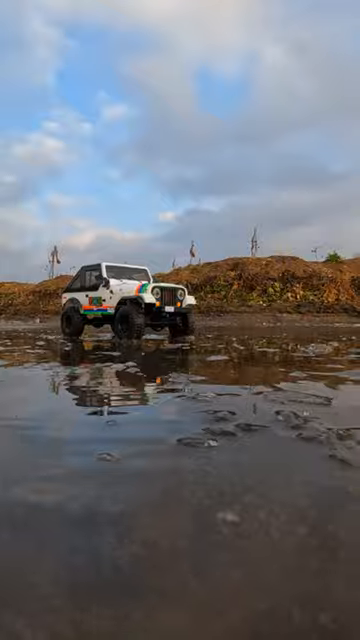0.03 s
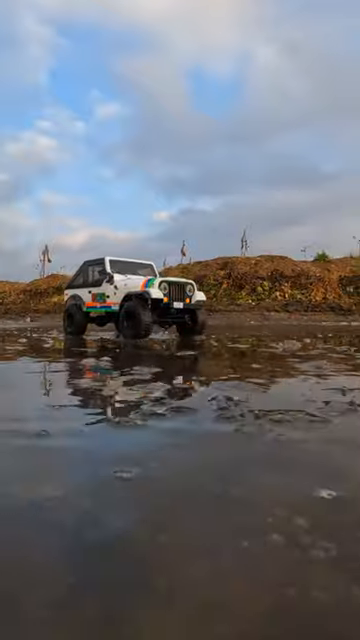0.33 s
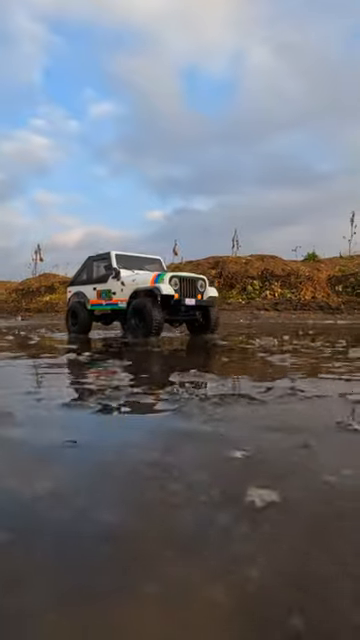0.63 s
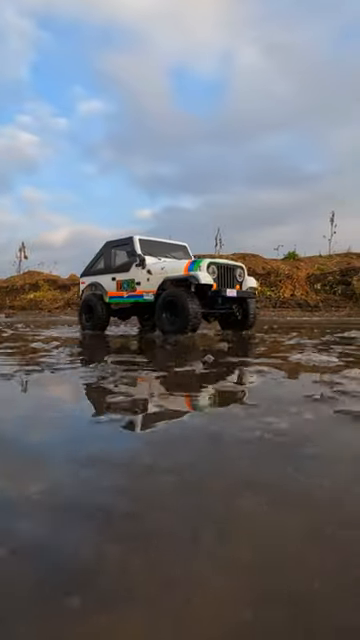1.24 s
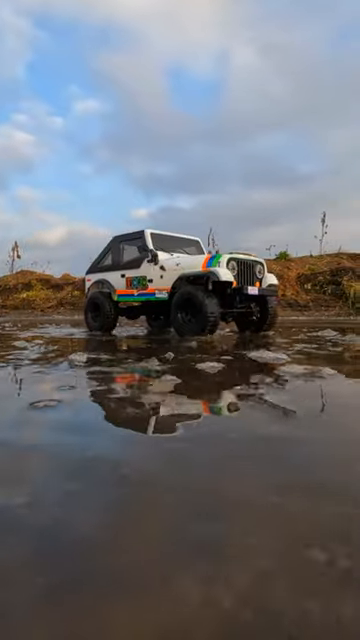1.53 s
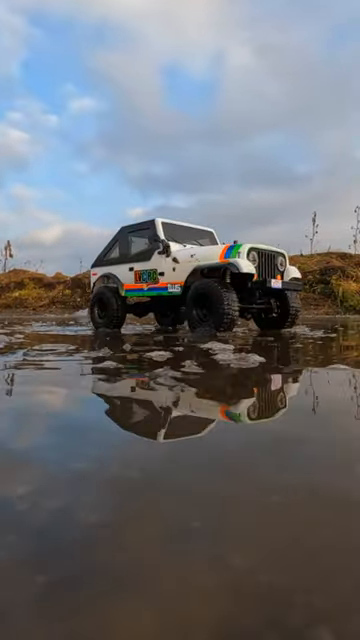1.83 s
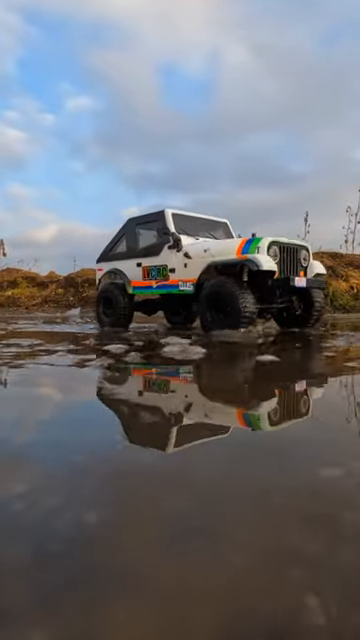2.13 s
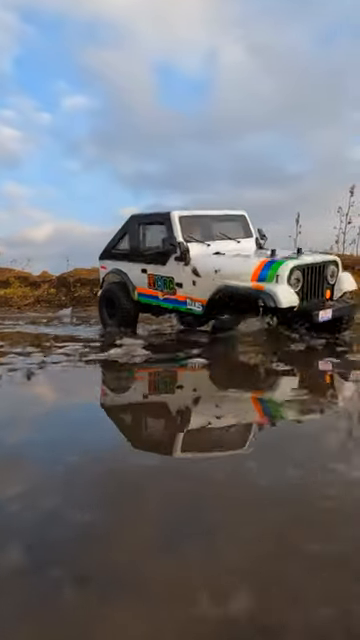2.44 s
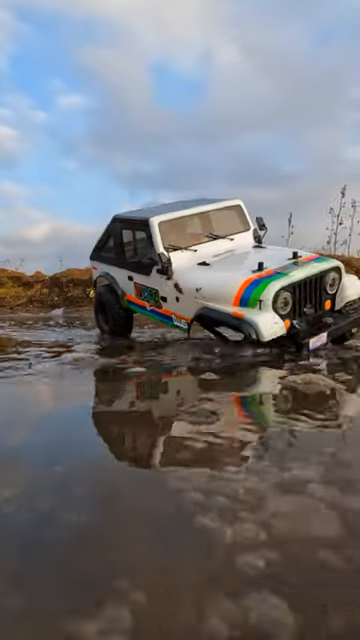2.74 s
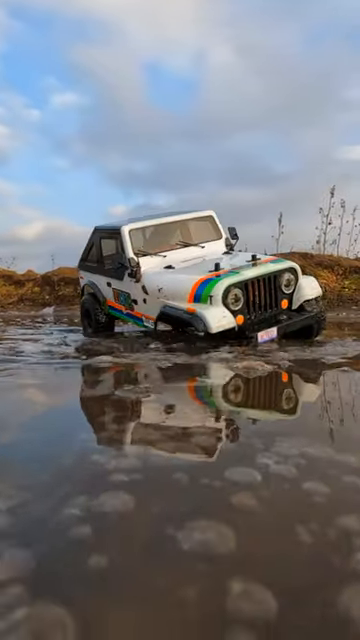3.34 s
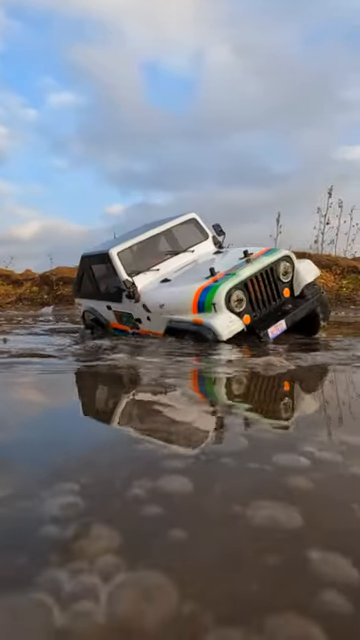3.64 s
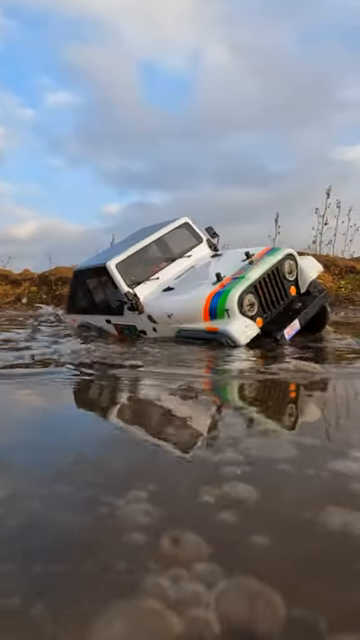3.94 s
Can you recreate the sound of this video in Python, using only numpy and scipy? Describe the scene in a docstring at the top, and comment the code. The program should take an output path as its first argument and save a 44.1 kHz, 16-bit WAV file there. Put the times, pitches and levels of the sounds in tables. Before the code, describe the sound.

Outdoors, a remote-controlled toy truck speeds up with a low electric hum, gear whirr and a wash of water. Close by, thin ice snaps, the hum briefly dips, and the tyres slosh and bubble through the puddle.

```python
"""A small remote-controlled truck rolls through an icy puddle, head-on towards a low microphone.
Its motor spins up to a deep hum over whirring gears and the wash and spray of the tyres.
Thin ice cracks under the wheels and the truck sinks in: the hum dips, the water churns and
air pockets gulp. Close to the microphone, water and ice spread wide; faint outdoor hiss lies behind."""
import sys
import numpy as np
from scipy.fft import rfft, irfft, next_fast_len
from scipy.io import wavfile
from scipy.ndimage import map_coordinates

SR = 44100
rng = np.random.default_rng(int(sys.argv[2]) if len(sys.argv) > 2 else 0)


def int16_out(signal):
    """Quantize to a 16-bit WAV file."""
    q = np.round(np.clip(np.atleast_2d(signal).T, -1, 1) * 32767)
    wavfile.write(sys.argv[1], SR, q.astype(np.int16))


N = 176400  # 4 s


def drive():
    """Motor and gears turn together, at a slightly unsteady speed."""
    # motor speed: time_s, speed_hz
    motor_speed = [(.6, 41.03), (.8, 45.2), (.95, 60.06), (1.05, 71.97), (1.17, 85.8), (1.27, 93.4),
                   (1.5, 101.3), (2, 109.2), (2.75, 115.3), (2.9, 120.1), (3.58, 135), (3.8, 108.1),
                   (3.88, 87.5), (4, 106)]
    speed = curve(motor_speed)
    turn = 2 * np.pi * np.cumsum(speed * (1 + 0.00582 * wobble(29.85))) / SR  # shaft angle, rad
    return motor(speed, turn) + gears(turn)


def motor(speed, turn):
    """One thrust a turn; its harmonics sweep through the resonances of the truck's body."""
    # the body's response: frequency_hz, gain_db
    body = [(40, -41), (58, -1), (85, 1.5), (116, -0.5), (145, -5), (180, -13), (205, -8), (230, -7),
            (285, -23.5), (340, -16.5), (430, -30), (900, -32.5), (1300, -43)]
    # hum ahead of that response: time_s, level_db
    hum_level = [(.04, -33), (.74, -30), (.92, -24.5), (1.09, -15.5), (1.26, -15), (1.55, -17.5), (2, -15),
                 (2.5, -16.5), (2.82, -16), (2.92, -21.5), (2.96, -30), (3.25, -31), (3.41, -20),
                 (3.8, -20.5), (3.89, -17.5), (4, -17)]
    hum = np.cos(turn) * amp(along(body, speed) + 0.35 * wobble(25.1))
    for harmonic in range(2, 12):
        hum += np.cos(harmonic * turn) * amp(along(body, harmonic * speed) + 0.84 * wobble(14))
    return -np.sqrt(2) * hum * amp(curve(hum_level))


def gears(turn):
    """The gears rattle their housing on every turn, and the meshing teeth whine roughly."""
    # housing resonances: centre_hz, width_hz, gain_db
    housing = [(910, 65, 5), (1048, 130, 2.5), (1213, 74, -2), (1438, 82, 0.5), (1820, 220, -1.5),
               (2390, 130, -4), (2673, 86, -1), (2958, 86, -2.5)]
    # gear whirr, drowned as the truck sinks: time_s, level_db
    gear_level = [(.04, -41.5), (.72, -44.5), (1.25, -33.5), (2.05, -33), (2.85, -31), (3.3, -33.5)]
    teeth, jitter_rad, whine_db = 17, 0.82, -10
    beat_depth, flex_s = 0.29, 0.00018
    rattle = rng.standard_normal(N) * (1 + beat_depth * np.sin(turn))
    ring = filtered(rattle, lambda hz: sum(amp(db) / (1 + (2 * (hz - centre) / width) ** 2)
                                           for centre, width, db in housing))
    # the housing flexes under load, so its ring wavers
    whirr = unit(map_coordinates(ring, [np.arange(N) + flex_s * SR * wobble(25)]))
    whine = unit(np.sin(teeth * turn + jitter_rad * wobble(150))) * amp(whine_db)
    return (whirr + whine) * amp(curve(gear_level) + 1.5 * wobble(30.01))


def chassis():
    """The chassis rumbles as the truck rolls."""
    # rumble spectrum: frequency_hz, density_db
    colour = [(20, -20), (40, -5), (65, -1.5), (90, 3), (130, 0), (180, -5.5), (420, -22), (620, -12.5),
              (1100, -32), (4000, -92)]
    # rumble: time_s, level_db
    level = [(.04, -22.5), (.3, -26), (.75, -26), (1.1, -25), (2.7, -24), (3, -27), (3.28, -24),
             (3.45, -19.5), (3.9, -21.5)]
    return noise(colour) * amp(curve(level))


def wash():
    """The wheels push water ahead of them in a low, bubbling wash."""
    # wash spectrum: frequency_hz, density_db
    colour = [(80, -43), (180, 3), (330, 1), (480, -3), (700, -5), (800, -9), (1000, -12), (1300, -20),
              (3000, -42), (12000, -60)]
    # wash: time_s, level_db
    level = [(.04, -27), (.35, -32.5), (.74, -32.5), (.92, -29), (1.5, -28), (2.38, -27.5), (2.48, -22),
             (2.72, -26.5), (2.9, -24.5), (3.16, -20.5), (3.55, -20), (3.78, -25.5), (3.9, -20.5), (4, -25)]
    bubbles = water(colour, low_hz=199.5, high_hz=1155, cycles=20.5, share=0.16, spread_db=0, count=1200)
    return bubbles * amp(curve(level))


def spray():
    """The tyres throw a fine spray, bright with tiny bubbles."""
    # spray spectrum: frequency_hz, density_db
    colour = [(400, -37), (1000, -3), (2000, 0.5), (3000, -1.5), (3600, -4.5), (7000, -9.5), (10000, -15.5),
              (13000, -23), (16000, -38)]
    # swell of the spray: time_s, relative_db
    level = [(.04, -46.5), (.72, -49.5), (.88, -42), (1.25, -37.5), (2.2, -34.5), (2.8, -34), (3.35, -28),
             (3.7, -33), (4, -36)]
    fizz = water(colour, low_hz=1018, high_hz=11720, cycles=49, share=0.22, spread_db=1.5, count=6000)
    return fizz * amp(curve(level) + 2.5)


def churn():
    """The tyres churn the hole once the truck has broken through."""
    # churning spectrum: frequency_hz, density_db
    colour = [(250, -50), (500, -14), (1000, -0.5), (2000, -5), (3000, -12.5), (5000, -17.5), (9000, -28.5),
              (16000, -34)]
    # churning: time_s, level_db
    level = [(.8, -66), (2.3, -44), (2.85, -39.5), (3.15, -27.5), (3.38, -23), (3.7, -27), (4, -25.5)]
    froth = water(colour, low_hz=456.6, high_hz=5020, cycles=52, share=0.44, spread_db=0.5, count=2600)
    return froth * amp(curve(level))


def ice():
    """Each crack is a run of tiny fractures that starts at once, dies fast and leaves trickling shards."""
    # fracture spectrum: frequency_hz, density_db
    colour = [(500, 2), (1500, 3.5), (2500, 3.5), (4500, 2), (8000, -1), (11000, -3), (16000, -8)]
    # cracks under the wheels: start_s, length_s, level_db, lower_edge_hz
    cracks = [(2.252, 0.0042, -33, 5970), (2.281, 0.021, -23, 1700), (2.323, 0.011, -32.5, 5000),
              (2.403, .008, -34, 4980), (2.445, 0.03, -27.5, 1302), (2.472, 0.007, -25.5, 1500),
              (2.48, 0.041, -29.5, 2000), (2.54, 0.01, -29, 5020), (2.55, 0.026, -24, 700),
              (2.575, 0.032, -32, 1500), (2.618, 0.004, -31.5, 5000), (2.632, 0.005, -31, 6100),
              (3.161, 0.0065, -32, 6000), (3.183, 0.0036, -20, 6000), (3.1993, 0.015, -17.5, 1000),
              (3.24, 0.0057, -22.5, 3500), (3.271, .003, -22.5, 3950), (3.386, 0.011, -24, 3500),
              (3.405, 0.0034, -24, 5950), (3.417, 0.0054, -22, 2500), (3.564, 0.0063, -33, 5510),
              (3.584, 0.012, -29, 5500)]
    release_s, shard_decay_s, shard_db = 0.0019, 0.038, -12.5
    t, out = np.arange(N) / SR, np.zeros(N)
    for start_s, length_s, level_db, edge_hz in cracks:
        fractures = unit(noise(colour) * amp(3.1 * wobble(700)))
        snap = unit(above(fractures, edge_hz))
        after = np.maximum(t - start_s - length_s, 0)
        trickle = amp(shard_db) * np.exp(-after / shard_decay_s)
        envelope = (t >= start_s) * np.maximum(np.exp(-after / release_s), trickle)
        out += snap * amp(level_db) * envelope
    return out


def gulps():
    """Large bubbles escape from under the ice."""
    # air pockets: start_s, pitch_hz, level_db, t60_s
    pockets = [(2.445, 277, -14.5, 0.086), (3.15, 499, -16, 0.36), (3.684, 203.4, -4.5, 0.1),
               (3.772, 1400, -12.5, 0.034), (3.79, 1628, -16, 0.036), (3.865, 417.7, -13, 0.17),
               (2.282, 1938, -17, 0.036)]
    t = np.arange(N) / SR
    return sum(amp(db) * bubble(np.maximum(t - start, 0), hz, t60) for start, hz, db, t60 in pockets)


def outdoor_hiss():
    """A faint, steady hiss behind the puddle."""
    # hiss spectrum: frequency_hz, density_db
    colour = [(2500, -12), (6800, -1), (10000, -10), (14000, -26)]
    return noise(colour) * amp(-55)


def water(colour, low_hz, high_hz, cycles, share, spread_db, count):
    """A swarm of bubbles on a bed of noise, rms about 1; share is the bubbles' part of the power."""
    when, pitch, size = rng.random((3, count, 1))
    hz = low_hz * (high_hz / low_hz) ** pitch
    age = np.arange(SR // 25)  # samples
    strength = amp(-spread_db * np.log(np.maximum(size, np.exp(-4))))
    grains = strength * bubble(age / SR, hz, cycles / hz) * hz
    positions = (when * N).astype(int) + age
    swarm = np.bincount(positions.ravel(), grains.ravel())[:N]
    return np.sqrt(share) * unit(coloured(swarm, colour)) + np.sqrt(1 - share) * noise(colour)


def bubble(t, hz, t60, rise=0.25):
    """A bubble rings as a damped tone with a soft start and a rising pitch."""
    phase = 2 * np.pi * hz * t * (1 + rise * t / t60 / 2)
    return np.sin(phase) * amp(-60 * t / t60) * (1 - np.exp(-t * hz))


def amp(db):
    """Gain from dB."""
    return 10 ** (np.asarray(db) / 20)


def unit(x):
    """x scaled to rms 1."""
    return x / np.sqrt(np.mean(x ** 2) + 1e-20)


def curve(rows):
    """One value per sample from rows of time_s, value."""
    return np.interp(np.arange(N) / SR, *np.transpose(rows))


def along(points, hz):
    """The value at hz from rows of frequency_hz, value, on a log axis."""
    frequencies, values = np.transpose(points)
    return np.interp(np.log(hz + 1), np.log(frequencies), values)


def wobble(rate):
    """A smooth random curve, rate knots a second."""
    knots = rng.standard_normal(int(N * rate / SR) + 4)
    return map_coordinates(knots, [np.arange(N) * rate / SR])


def filtered(x, response):
    """x through a gain that depends on frequency."""
    size = next_fast_len(N + 8192)
    return irfft(rfft(x, size) * response(np.fft.rfftfreq(size, 1 / SR)), size)[:N]


def coloured(x, points):
    """x shaped by rows of frequency_hz, gain_db."""
    return filtered(x, lambda hz: amp(along(points, hz)))


def above(x, edge_hz):
    """What lies above a soft lower edge."""
    return filtered(x, lambda hz: hz ** 2 / np.hypot(hz ** 2, edge_hz ** 2))


def noise(points):
    """Coloured noise of rms 1."""
    return unit(coloured(rng.standard_normal(N), points))


def scene():
    """The truck is straight ahead of the microphone; water and ice spread out at close range."""
    # width of the wash: time_s, side_against_mid_db
    width = [(2.3, -84), (2.47, -14), (2.58, -19), (2.72, -85), (3.1, -33.5), (4, -11.5)]
    t = np.arange(N) / SR
    mid = drive() + chassis() + spray() + churn() + wash() + ice() + gulps() + outdoor_hiss()
    # the sheet gives way all round the front wheel; only fine shards scatter to the sides
    giving_way = (t > 2.43) & (t < 2.65)
    shards = above(ice(), edge_hz=6547) * amp(-8) * giving_way
    side = wash() * amp(curve(width)) + shards
    return np.array([mid + side, mid - side])


def record(dry):
    """The stereo microphone opens after a moment and passes nothing above its band limit."""
    start_s, top_hz = 0.036, 15850
    live = np.arange(N) / SR >= start_s
    return np.array([filtered(channel * live, lambda hz: hz < top_hz) for channel in dry])


dry = scene()
out = record(dry)
int16_out(out)
```